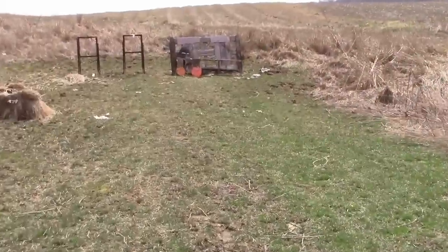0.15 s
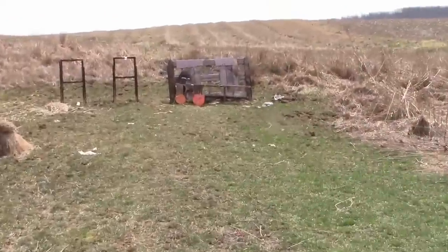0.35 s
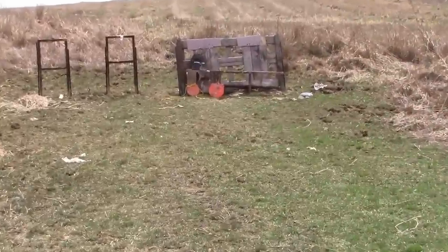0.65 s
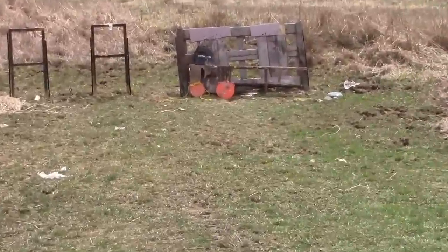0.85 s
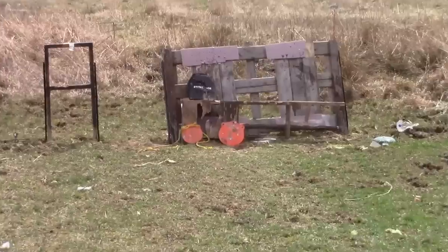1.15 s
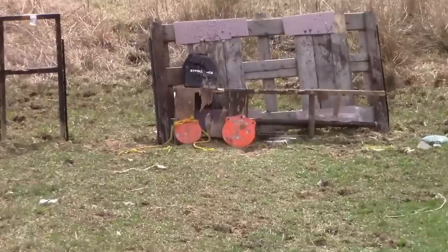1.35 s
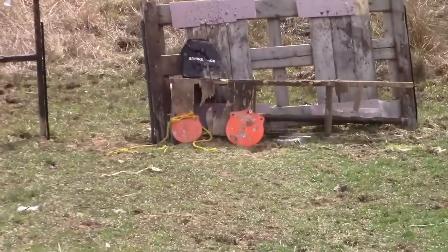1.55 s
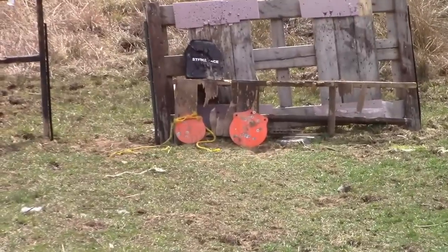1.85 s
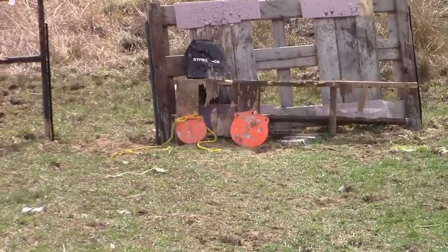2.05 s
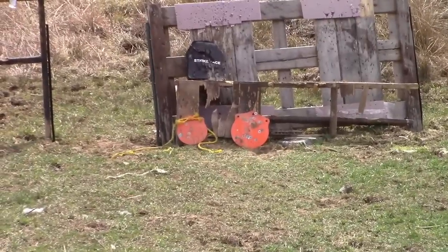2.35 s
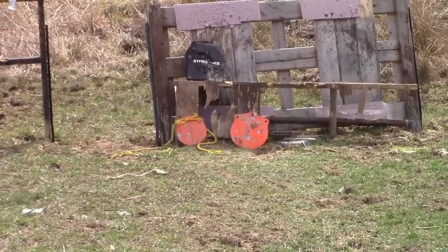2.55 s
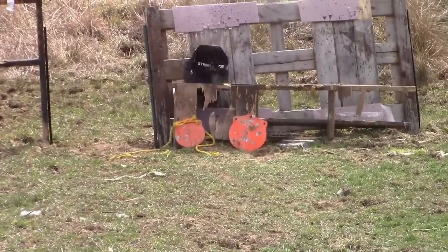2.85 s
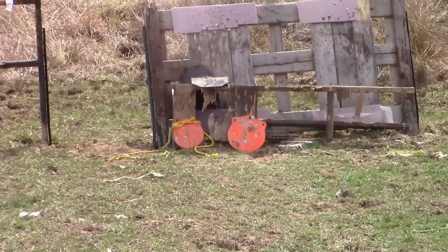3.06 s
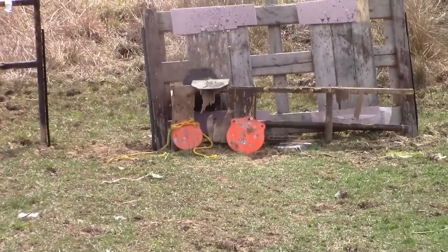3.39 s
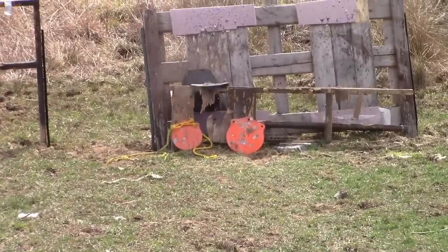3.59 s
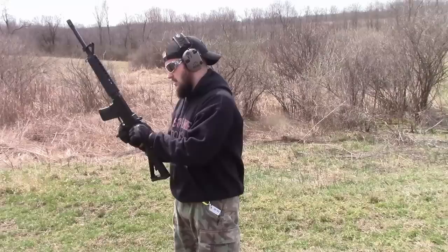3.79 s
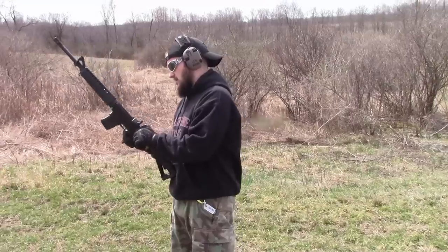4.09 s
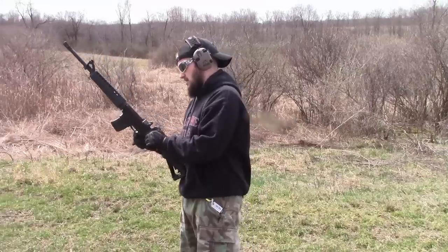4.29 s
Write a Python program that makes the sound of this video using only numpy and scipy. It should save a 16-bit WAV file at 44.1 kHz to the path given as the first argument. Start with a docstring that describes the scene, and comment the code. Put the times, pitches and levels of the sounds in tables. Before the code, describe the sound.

It starts very quiet outdoors, with only a light rush of air, a faint zoom motor and tiny handling ticks. Then one very loud, close rifle shot distorts the microphone, followed at once by the clang and short ring of a steel target and a lumpy echo from the tree line. The echo stops abruptly, giving way to low wind thumps on the microphone, metallic rifle clicks and a quick slide of the bolt.

```python
"""A rifle shot at a steel plate

In an open field the hammer falls and the blast overloads the microphone. The plate rings
and is knocked over, and a line of trees rolls the bang back. The scene jumps to a moment
later: wind bumps the microphone while the rifle is handled and its bolt is drawn.
Underneath are a distant rush and the faint whir and clicks of a camera."""
import sys
import numpy as np
from scipy import signal
from scipy.fft import rfft, irfft, next_fast_len
from scipy.io import wavfile

SR = 44100
rng = np.random.default_rng(int(sys.argv[2]) if len(sys.argv) > 2 else 0)


def waveform_to_disk(signal):
    """Save audio, clipped to [-1, 1], as 16-bit WAV at the path in sys.argv[1]."""
    frames = np.transpose(np.atleast_2d(signal))
    scaled = np.clip(frames, -1, 1) * 32767
    samples = np.round(scaled).astype(np.int16)
    wavfile.write(sys.argv[1], SR, samples)


N = 195318
T = np.arange(N) / SR
SHOT_S, LATER_S = 2.628, 3.828  # when the rifle fires, and when the scene jumps ahead


# The parts of the bang. Each row: start in seconds, level in dB, seconds to fade by 60 dB,
# tilt in dB per octave (higher is brighter).
BANG_PARTS = [(2.6264, -16, 0.01, 1.5), (2.6278, 0.7, 0.026, 2.2), (2.6315, -7, .048, 0.5),
              (2.646, -20.5, 0.069, -4.5), (2.658, -19, 0.069, -4.5), (2.67, -18, .07, -1),
              (2.6855, -13, .03, -1)]
# A colour says how strong the low and high sounds are. Each row: frequency in Hz, level in dB.
BANG_COLOUR = [(40, -42), (120, -25), (300, -11), (570, 0.5), (900, -2.5), (1250, -8), (1800, 0.5),
               (3000, -4), (4200, -6), (6000, -6), (9000, -11.5), (12000, -21), (15500, -28)]
def bang():
    """A sharp crack, the muzzle blast and its first ground reflections merge into one bang."""
    return bursts(BANG_PARTS, BANG_COLOUR)


# The plate's notes. Each row: pitch in Hz, level in dB, loudest moment in seconds,
# seconds to fade by 60 dB.
PLATE_NOTES = [(783, -20, 2.858, .4), (897, -12.5, 2.835, .7), (907, -20.5, 2.775, .3),
               (1150.5, -15, 2.80, .58), (1216.5, -13.8, 2.733, .58), (1415, -17.7, 2.795, 1.02),
               (1511, -22.5, 2.875, .3), (1642.5, -17, 2.79, .62), (1660, -22.5, 2.78, .4),
               (1793, -16.5, 2.728, .5), (1824, -23.5, 2.72, .55), (1927, -28, 2.78, .4),
               (2150, -23.5, 2.76, .55), (2219, -24.5, 2.75, .58), (2562, -27, 2.77, .4),
               (2721, -21, 2.775, .45), (2840, -17.5, 2.765, .28), (2977, -25.5, 2.77, .33),
               (3141, -18, 2.77, .27), (3526, -26, 2.825, .25), (3665, -22, 2.828, .18),
               (3826, -14, 2.695, .11), (3962, -15.5, 2.707, .15), (4231, -23.5, 2.835, .13),
               (4497, -22, 2.817, .11)]
# Its weaker notes: lowest and highest pitch in Hz, level in dB, seconds to fade by 60 dB.
FAINT_NOTES = (1250, 4000, -28.5, 0.3)
# The bullet's hit, flying splinters and the toppling plate. Rows as in BANG_PARTS and BANG_COLOUR.
STRIKES = [(2.6905, -7.5, 0.055, 3), (2.7195, -20, .02, 3), (2.812, -12.5, 0.055, -2),
           (2.831, -13.5, .07, -2.5), (2.9045, -13, 0.063, -5), (2.943, -29, .025, -5),
           (2.962, -27.5, .025, -7), (2.972, -30, .025, -7), (3.033, -49.5, .06, 10)]
STRIKE_COLOUR = [(100, -38), (600, -13), (1000, -8), (2000, 0), (4200, -0.5), (7000, -4.5), (10000, -15),
                 (15000, -30.5)]
def steel_plate(swell_s=0.011, flutter_depth=.16, grounded_s=3.005, damping_db_per_s=85):
    """The struck plate rings with a wavering tone as its sound arrives by several paths."""
    ringing = (T > SHOT_S) & (T < LATER_S)
    t, ring = T[ringing], np.zeros((2, N))
    low_hz, high_hz, faint_db, faint_fade_s = FAINT_NOTES
    faint = [(low_hz + (high_hz - low_hz) * height, faint_db, 2.71 + 0.12 * delay, faint_fade_s)
             for height, delay in rng.random((22, 2))]
    for hz, db, peak_s, fade_s in PLATE_NOTES + faint:
        age = t - peak_s
        envelope = np.exp(-(np.minimum(age, 0) / swell_s / 2) ** 2) * fade(np.maximum(age, 0), fade_s)
        depth = flutter_depth * min(hz / 1000, 2)  # higher notes waver more, in level and pitch
        flutter = (1 + depth * (drift(30, t) + 1j * drift(30, t))) / np.sqrt(1 + 2 * depth ** 2)
        tone = np.exp(2j * np.pi * (hz * t + rng.random((2, 1))))
        ring[:, ringing] += amp(db) * envelope * (flutter * tone).real
    damping = amp(-damping_db_per_s * np.maximum(T - grounded_s, 0))  # dies faster once it lies down
    return ring * ramp(STRIKES[0][0], 0.005) * damping + bursts(STRIKES, STRIKE_COLOUR)


# The nearby wash in three bands, then a thin one from farther brush. Each gives: loudest moment
# in seconds, level in dB, rise and fall in dB per second.
FIELD_BASS = (2.835, -28.8, 25, 85)
FIELD_BODY = (2.835, -21, 0, 135)
FIELD_TREBLE = (2.672, -18.8, 150, 172)
FAR_BRUSH = (3.0, -48, 200, 60)
# Each row: frequency in Hz, level in dB.
FIELD_COLOUR = [(40, -41.5), (90, -35), (160, -13), (240, 0), (400, -2), (600, -5), (1000, -4), (1700, 1.5),
                (3800, -3), (5200, -11.5), (9000, -16), (12000, -30), (15500, -42)]
def field_wash(patchy_db=.9):
    """Ground and brush scatter the bang into a wash that swells and dies, the treble first."""
    near = scatter(FIELD_COLOUR, grains(20000, 1.4),
                   swell(*FIELD_BASS), swell(*FIELD_BODY), swell(*FIELD_TREBLE))
    near = near * ramp(SHOT_S, 0.0065) * amp(patchy_db * drift(60))
    brush = unit(tint(grains(9000, 1.4), FIELD_COLOUR, tilt_db=-1)) * swell(*FAR_BRUSH)
    return near + brush


# The roll from the tree line, then from the woods beyond. Rows as in FIELD_BASS and FIELD_COLOUR.
TREE_ROLLS = [(3.22, -19.8, 110, 42), (3.79, -39.3, 48, 15)]
TREE_COLOUR = [(35, -89), (60, -63), (170, -18.5), (242, -15.5), (361, -21), (576, -6), (680, -1),
               (1020, -7), (1140, -8.5), (2330, -10), (3240, -13), (4050, -21), (4840, -28), (12000, -71),
               (15600, -99), (22000, -120)]
def tree_roll(arrive_s=3.078, bass_db=-7.3, treble_db=-21, thinning_db_per_s=6):
    """Trees send the bang back as a late, lumpy roll whose bass thins out as it goes."""
    envelope = np.sqrt(sum(swell(*row) ** 2 for row in TREE_ROLLS)) * ramp(arrive_s, .05)
    bass = amp(bass_db + 2 * drift(40) - thinning_db_per_s * np.maximum(T - arrive_s, 0))
    reflections = scatter(TREE_COLOUR, grains(6000, 1.3), bass, 1, amp(treble_db))
    return absorb(reflections, arrive_s) * envelope * amp(0.9 * drift(60))


# The strongest reflections. Rows as in BANG_PARTS and BANG_COLOUR.
ECHOES = [(2.646, -19, .06, -3), (2.668, -18.5, .07, -3), (2.718, -21, .06, -4), (3.121, -29, 0.06, 0),
          (3.1935, -16.5, 0.055, -1), (3.2175, -14.5, 0.052, -2), (3.227, -16, 0.068, 0),
          (3.249, -14.5, 0.013, 2.5), (3.254, -22, .06, -2), (3.2915, -14.5, 0.07, -4),
          (3.2995, -14, 0.045, -4.5), (3.374, -28, .06, -4), (3.661, -34, .03, -4.5)]
ECHO_COLOUR = [(80, -42), (200, -16), (380, -21.5), (520, -4.5), (660, 3.5), (900, -6), (1300, -10.5),
               (3200, -10.5), (4800, -25.5), (8000, -47), (15000, -79)]
def echoes():
    """Single strong reflections come back as short, duller bangs."""
    return bursts(ECHOES, ECHO_COLOUR)


# Each row: start in seconds, level in dB, pitch in Hz, seconds to fade by 60 dB.
THUMPS = [(2.655, -17.5, 473, 0.14), (2.72, -17.5, 377, 0.045), (2.82, -26, 215, 0.06),
          (3.952, -32, 280, .02), (3.975, -35, 230, 0.031), (4.291, -26.5, 482, 0.018),
          (4.316, -29, 320, 0.021), (4.334, -33, 190, .03), (4.41, -33.5, 257, 0.043)]
def thumps(wander=.08):
    """The shot, and later wind buffeting the microphone, make dull low thumps."""
    out, t = np.zeros((2, N)), np.arange(8000) / SR
    for start_s, db, hz, fade_s in THUMPS:
        envelope = (1 - np.exp(-t * hz)) ** 3 * fade(t, fade_s)
        cycles = np.cumsum(hz * (1 + wander * drift(95, t))) / SR + rng.random((2, 1))
        add(out, start_s, amp(db) * envelope / envelope.max() * np.sin(2 * np.pi * cycles))
    return out


# Handling clicks, and the hammer just before the blast. Rows as in BANG_PARTS and BANG_COLOUR.
RIFLE_CLICKS = [(.125, -51, 0.054, -8), (.423, -55, .02, -1), (.8205, -54, .02, -6), (1.168, -54, .02, -5),
                (1.801, -61, .04, 1), (2.6195, -19, .02, -4), (3.9476, -34.5, 0.034, -2),
                (3.987, -47, .015, -1), (4.0165, -33, 0.034, 0), (4.3063, -46, .08, -7),
                (4.3267, -46, .02, -1), (4.3412, -30, 0.054, -5), (4.3537, -25, .02, 2),
                (4.394, -17, 0.017, 1), (4.398, -30, 0.024, -2.5)]
RIFLE_COLOUR = [(200, -27.5), (1000, -11), (1700, -1), (2200, -5.5), (2800, 0.5), (3900, -7), (4700, -3),
                (5800, -7.5), (6850, 3), (7600, -6.5), (11000, -11), (15500, -32.5)]
# The bolt speeds up and stops: fastest moment in seconds, level in dB, rise and fall in dB per second.
BOLT_SLIDE = (4.388, -31.5, 170, 370)
# Each row: pitch in Hz, width in Hz, level in dB compared with the scrape.
BOLT_NOTES = [(5750, 80, -13), (6567, 110, -12)]
def rifle(bolt_free_s=4.34, ticks_per_s=12, ticks_db=-84, side_db=-8):
    """Steel parts click, the bolt scrapes and sings on its rails, and gear and clothing tick."""
    rub = grains(12000, 1.5)
    singing = sum(amp(db) * sing(rub, hz, width) for hz, width, db in BOLT_NOTES)
    scrape = unit(tint(rub, RIFLE_COLOUR, tilt_db=-0.6))
    bolt = (scrape + singing) * swell(*BOLT_SLIDE) * ramp(bolt_free_s, .01)
    ticks = unit(tint(grains(ticks_per_s, 1.5), RIFLE_COLOUR, tilt_db=-4)) * amp(ticks_db)
    straight_ahead = amp([[0], [side_db]])
    return (bolt + ticks + bursts(RIFLE_CLICKS, RIFLE_COLOUR)) * straight_ahead


# Each row: strongest moment in seconds, level in dB, length in seconds.
GUSTS = [(1.31, -58, .06), (1.68, -57, .35), (3.862, -49, .05), (3.958, -39, .095), (4.065, -47, .05),
         (4.175, -53.5, .05), (4.305, -37.5, .08), (4.405, -39, .12)]
# Each row: frequency in Hz, level in dB.
WIND_COLOUR = [(30, -34), (70, -19), (110, -5), (200, 0), (330, 0.5), (500, -8), (800, -19.5), (1500, -34),
               (4000, -70)]
def wind(lump_db=1.5):
    """Gusts bump the microphone with a low, lumpy rumble; each grows and eases evenly."""
    gusts = [amp(db) / np.cosh(2 * np.clip((T - peak_s) / length_s, -10, 10)) ** 2
             for peak_s, db, length_s in GUSTS]
    force = np.sqrt(sum(gust ** 2 for gust in gusts))
    return force * unit(tint(noise(), WIND_COLOUR) * amp(lump_db * drift(40)))


# Lever clicks and finger bumps. Rows as in BANG_PARTS and BANG_COLOUR.
LEVER_CLICKS = [(1.427, -52, .06, -4), (1.4335, -48.5, .05, -3), (1.4405, -41, .028, 1)]
LEVER_COLOUR = [(300, -14), (1300, 1), (2300, -4), (2940, 2), (3400, -10), (4010, -3), (4660, 0),
                (5700, -15), (7150, -7), (9000, -16), (15000, -30)]
FINGER_BUMPS = [(1.328, -49, .04, 0), (1.423, -43, .03, -3), (1.526, -49, .025, 3), (1.558, -49, .025, 0)]
FINGER_COLOUR = [(40, -8), (100, 0), (270, -3), (1500, -40)]
def camera_handling():
    """The zoom lever is let go and snaps back, and fingers bump the camera's body."""
    return bursts(LEVER_CLICKS, LEVER_COLOUR) + bursts(FINGER_BUMPS, FINGER_COLOUR)


# Each row: pitch in Hz, width in Hz, level in dB, start and stop in seconds.
ZOOM_TONES = [(1577, 200, -62.5, .07, .52), (5680, 200, -78, 0.0, 1.35)]
def zoom_motor(ease_s=.1):
    """The camera's zoom motor whirs faintly in two narrow bands of noise."""
    whir = np.zeros((2, N))
    for hz, width, db, start_s, stop_s in ZOOM_TONES:
        running = ramp(start_s - ease_s / 2, ease_s) - ramp(stop_s - ease_s / 2, ease_s)
        whir += sing(noise(), hz, width) * amp(db) * running
    return whir


# Each row: frequency in Hz, level in dB.
AIR_COLOUR = [(30, -17.5), (80, -16.5), (150, -9), (220, -7), (380, -7.5), (540, 1), (850, -4),
              (1100, -8.5), (1600, -11.5), (2000, -16.5), (3700, -21.5), (7000, -27.5), (11000, -33),
              (15500, -41.5)]
def open_air(rush_db=-53.3, hiss_db=-59.8):
    """A steady distant rush, joined by more hiss in the later moment."""
    rush = unit(tint(noise(), AIR_COLOUR)) * amp(rush_db + .45 * drift(8))
    hiss = unit(tint(noise(), AIR_COLOUR, tilt_db=2.5)) * amp(hiss_db)
    return rush + hiss * ramp(LATER_S, .005)


def amp(db):
    """Turns decibels into a number to multiply by."""
    return 10 ** (np.asarray(db) / 20)


def unit(x):
    """Scales a sound to an average (rms) level of 1."""
    return x / np.sqrt(np.mean(x ** 2, axis=-1, keepdims=True) + 1e-20)


def add(mix, start_s, sound):
    """Mixes a sound in at its start time."""
    part = mix[:, round(start_s * SR):][:, :sound.shape[1]]
    part += sound[:, :part.shape[1]]


def ramp(start_s, length_s):
    """Rises in a straight line from 0 to 1."""
    return np.clip((T - start_s) / length_s, 0, 1)


def fade(t, fade_s):
    """Falls by 60 dB every fade_s seconds."""
    return np.exp(-np.log(1000) * t / fade_s)


def swell(peak_s, db, rise_db_per_s, fall_db_per_s):
    """Grows to its loudest at peak_s, then dies away."""
    before, after = np.maximum(peak_s - T, 0), np.maximum(T - peak_s, 0)
    return amp(db - rise_db_per_s * before - fall_db_per_s * after)


def noise(size=N):
    """White noise in two rows: mid (what both ears share) and side (how they differ)."""
    return rng.standard_normal((2, size))


def drift(per_s, t=T):
    """A smooth random wobble that changes about per_s times a second."""
    times = np.arange(0, N / SR + .01, .002)
    hz = np.fft.rfftfreq(len(times), times[1])
    spectrum = rfft(rng.standard_normal(len(times))) * np.exp(-(hz / per_s) ** 2)
    return np.interp(t, times, unit(irfft(spectrum, len(times))))


def grains(per_s, spread_db):
    """Tiny pulses of uneven size at random moments."""
    sizes = amp(spread_db * np.minimum(rng.exponential(1, N), 4))
    return noise() * sizes * (rng.random(N) < per_s / SR)


def level_at(colour, hz):
    """Looks up a colour's level in dB, gliding between its rows."""
    row_hz, row_db = np.transpose(colour)
    return np.interp(np.log(hz + 1), np.log(row_hz + 1), row_db)


def tint(x, colour, tilt_db=0):
    """Gives a sound a colour, tilted by tilt_db per octave above 400 Hz."""
    hz = abs(np.fft.fftfreq(4096, 1 / SR))
    log_gain = np.log(amp(level_at(colour, hz) + tilt_db * np.log2(np.maximum(hz, 400) / 1000)))
    taps = np.fft.ifft(np.exp(np.conj(signal.hilbert(log_gain)))).real  # rings only after a hit
    return signal.fftconvolve(x, taps[None], axes=1)[:, :x.shape[1]]


def sing(x, hz, width):
    """Keeps a narrow band of a sound, so that it rings like a note."""
    band = signal.butter(2, [hz - width / 2, hz + width / 2], "band", fs=SR, output="sos")
    return unit(signal.sosfilt(band, x))


def bursts(rows, colour, size=12000):
    """Each blow is a puff of noise that starts at once and dies away."""
    out, t = np.zeros((2, N)), np.arange(size) / SR
    for start_s, db, fade_s, tilt_db in rows:
        envelope = fade(t, fade_s)
        puff = tint(noise(size) * envelope, colour, tilt_db)
        add(out, start_s, amp(db) * unit(puff) * np.sqrt(np.mean(envelope ** 2)))
    return out


def scatter(colour, pulses, bass, body, treble):
    """Countless small reflections, with separate loudness for bass, body and treble."""
    size = next_fast_len(N)
    hz = np.fft.rfftfreq(size, 1 / SR)
    spectrum = rfft(pulses, size) * amp(level_at(colour, hz))
    low = 1 / (1 + (hz / 700) ** 8)
    high = 1 - 1 / (1 + (hz / 4500) ** 10)
    bands = [(low, bass), (1 - low - high, body), (high, treble)]
    return sum(unit(irfft(spectrum * band, size)[:, :N]) * gain for band, gain in bands)


def absorb(x, since_s, db_per_khz_per_s=5.3):
    """Later reflections have crossed more air, which takes more of their treble."""
    hz, times, spectra = signal.stft(x, SR, nperseg=512, noverlap=384)
    loss_db = db_per_khz_per_s * hz[:, None] / 1000 * np.maximum(times - since_s, 0)
    return signal.istft(spectra * amp(-loss_db), SR, nperseg=512, noverlap=384)[1][:, :N]


def stereo(mid_side, width):
    """Left and right at two close microphone openings, which differ most in the treble."""
    mid, side = mid_side[0], tint(mid_side[1:], width)[0]
    return np.array([mid + side, mid - side])


# Stereo width of the events and the background. Each row: frequency in Hz, gain of the side in dB.
EVENT_WIDTH = [(60, -13), (200, -40), (500, -52), (1200, -43), (2300, -22.5), (4200, -12.5), (8000, -9),
               (13000, -5.5)]
BACKGROUND_WIDTH = [(60, -12.5), (110, -18.5), (200, -27.5), (380, -35), (700, -60.5), (1290, -43.5),
                    (2380, -15.5), (4400, -9.5), (8120, -7.5), (15000, -7)]
def scene():
    """Mixes everything in stereo; the wash and the roll stop short at the jump in time."""
    reflections = (field_wash() + tree_roll()) * (1 - ramp(LATER_S - .004, 0.0093))
    shot = bang() + reflections + echoes()
    events = shot + steel_plate() + thumps() + rifle() + camera_handling() + wind()
    return stereo(events, EVENT_WIDTH) + stereo(open_air() + zoom_motor(), BACKGROUND_WIDTH)


def record(dry, low_cut_hz=70, high_cut_hz=15650):
    """The blast overloads the microphone; then the deepest bass and highest treble are cut."""
    clipped = dry / (1 + dry ** 8) ** (1 / 8)
    thinned = signal.lfilter(*signal.butter(1, low_cut_hz, "high", fs=SR), clipped)
    high_cut = signal.firwin(511, high_cut_hz, window=("kaiser", 9), fs=SR)
    return signal.oaconvolve(thinned, high_cut[None], "same")


dry = scene()
out = record(dry)
waveform_to_disk(out)
```